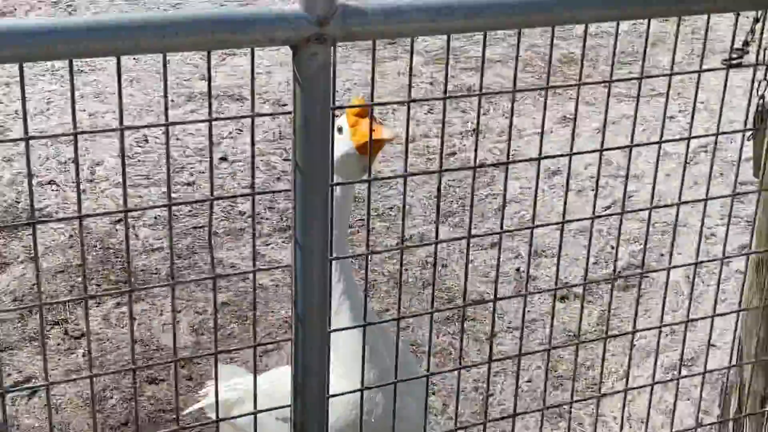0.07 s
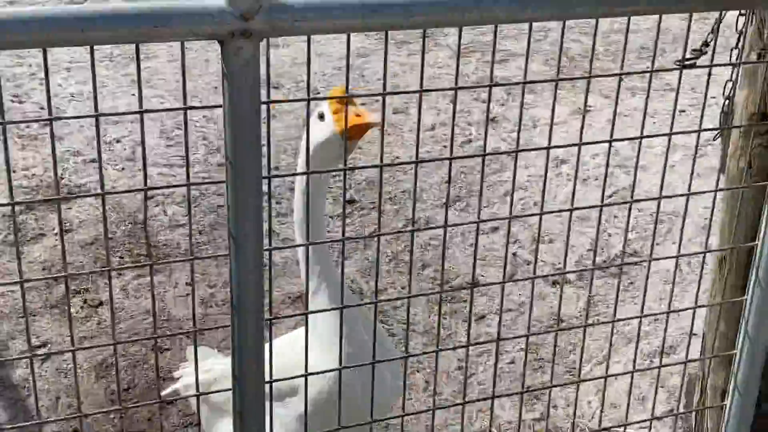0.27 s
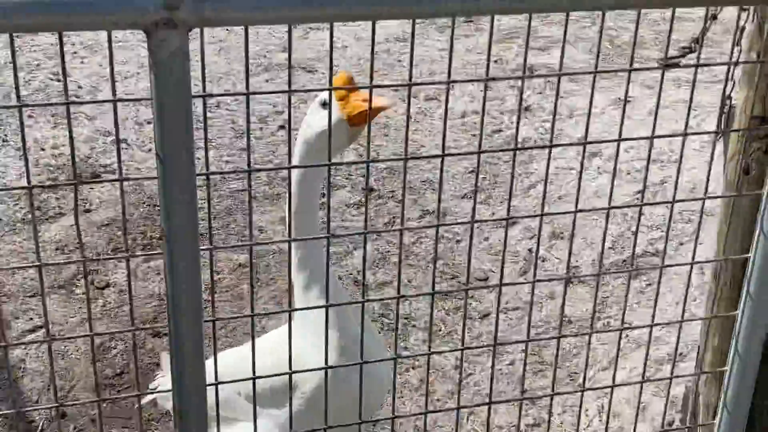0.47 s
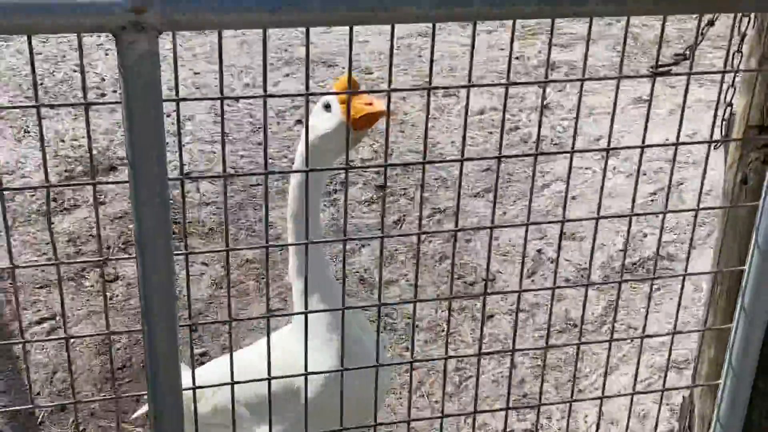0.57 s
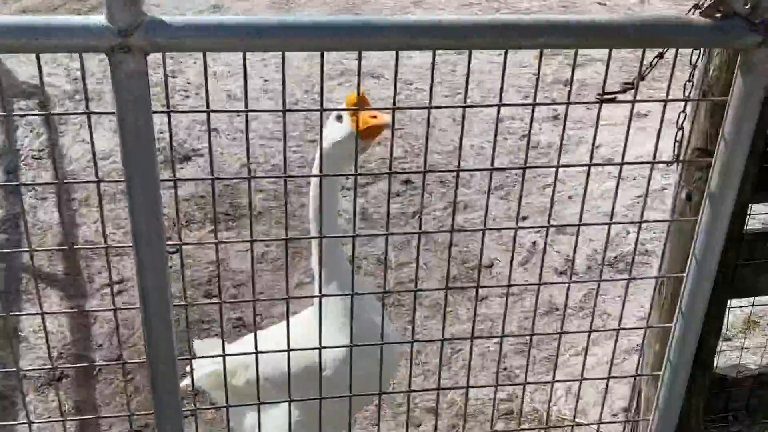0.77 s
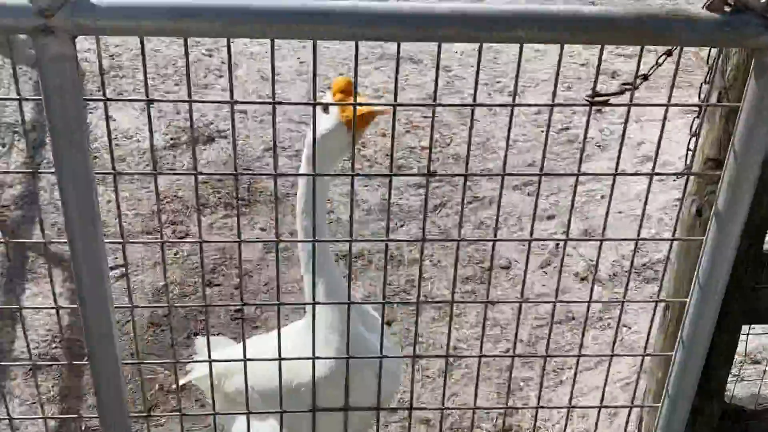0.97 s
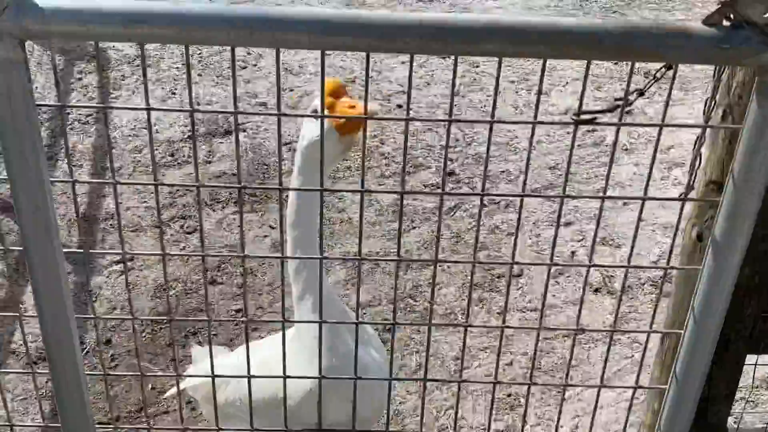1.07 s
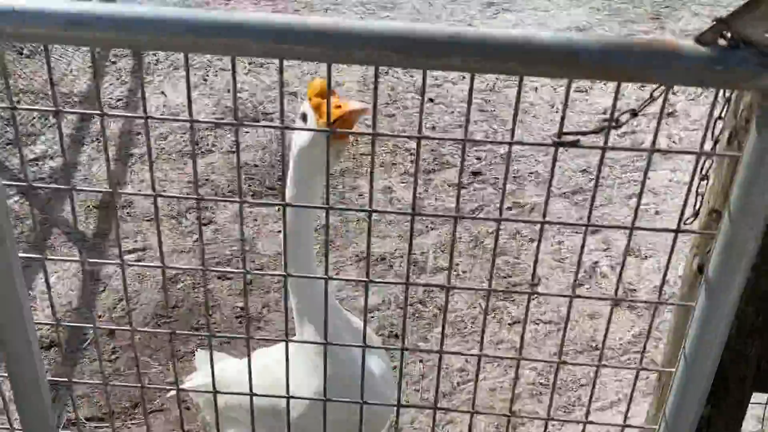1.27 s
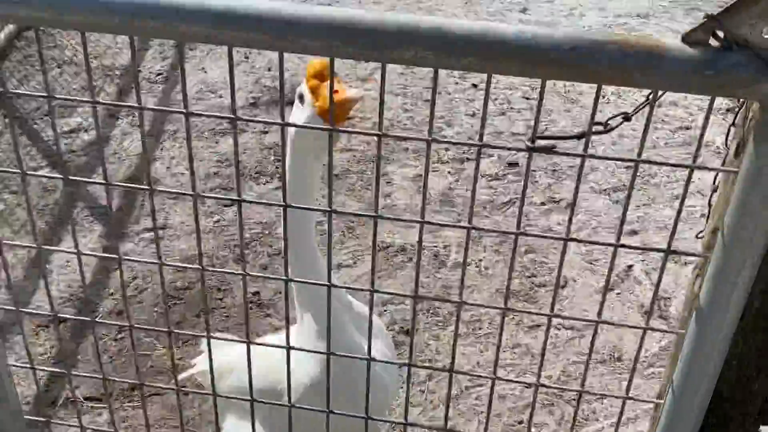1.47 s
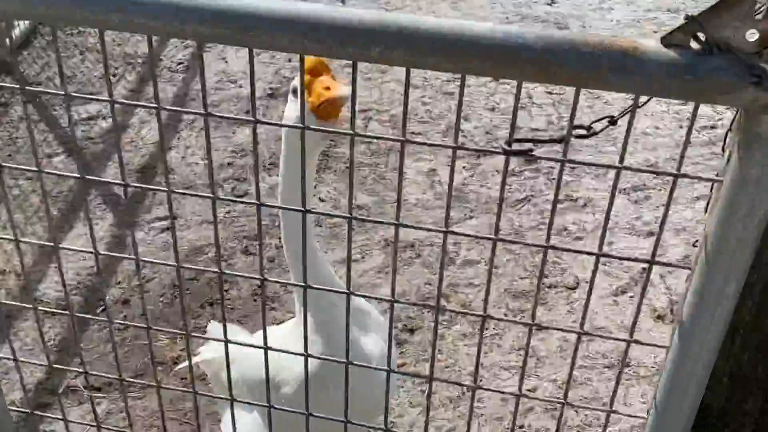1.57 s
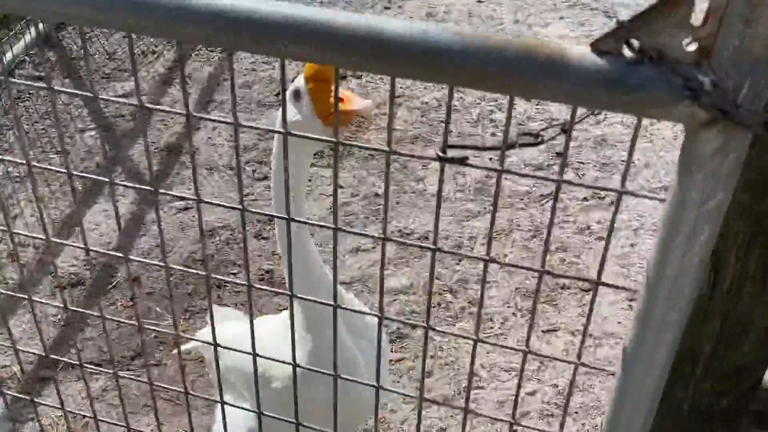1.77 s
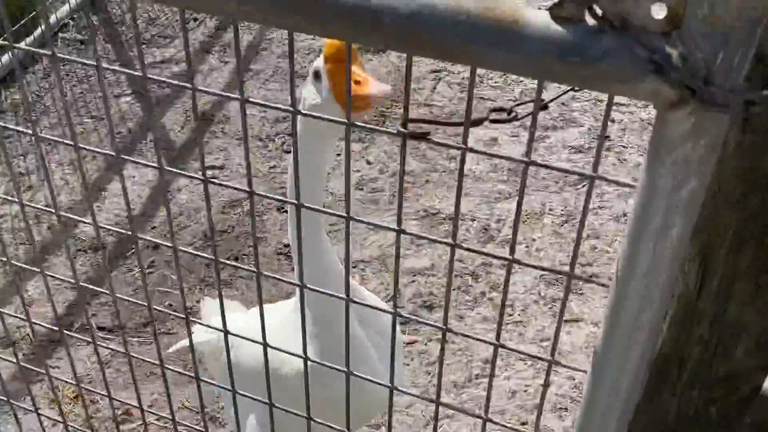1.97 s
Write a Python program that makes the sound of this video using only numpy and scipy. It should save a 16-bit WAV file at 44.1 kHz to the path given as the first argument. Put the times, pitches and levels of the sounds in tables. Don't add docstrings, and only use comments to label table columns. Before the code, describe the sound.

After small dry taps and a faint feather rustle in an open dirt pen, one abrupt goose honk bursts out slightly left, then drops into a rough growl with a last knock; faint wind and steady hiss behind.

```python
import sys
import numpy as np
from scipy import signal
from scipy.fft import rfft, irfft
from scipy.io import wavfile

SR = 44100
rng = np.random.default_rng(int(sys.argv[2]) if len(sys.argv) > 2 else 0)


def persist_wave(psi):
    counts = np.round(np.clip(psi, -1, 1) * 32767).astype(np.int16)
    wavfile.write(sys.argv[1], SR, np.atleast_2d(counts).T)


def rack_gain(trim_db):
    fader = np.asarray(trim_db, float)
    return 10 ** (fader / 20)


N = 88861
T = np.arange(N) / SR


def in_time(rows):
    s, *columns = np.transpose(rows)
    gate = np.clip(np.minimum(T - s[0], s[-1] - T) / 0.0024, 0, 1)
    return [np.interp(T, s, c) for c in columns] + [gate]


def at_hz(points, hz):
    table_hz, values = np.transpose(points)
    return np.interp(np.log(hz), np.log(table_hz), values)


def rms_one(x):
    return x / np.sqrt(np.mean(x ** 2) + 1e-20)


def drift(rate):
    r = np.exp(-2 * np.pi * rate / SR)
    walk = signal.lfilter([1], [1, -2 * r, r * r], rng.standard_normal(N + SR))
    return rms_one(walk[SR:])


def filtered(x, order, hz, kind):
    return signal.sosfilt(signal.butter(order, hz, kind, fs=SR, output="sos"), x)


def turn(hz, wander=0.0023):
    return 2 * np.pi * np.cumsum(hz * (1 + wander * drift(61))) / SR


def stack(levels_db, phase, start, other=0, hz=None, other_hz=0):
    # time in seconds, centre in Hz, lift in dB.
    beak = [(1.31, 3010, -29), (1.328, 3100, 20), (1.343, 2800, 2), (1.357, 2500, 12), (1.37, 2710, 15),
            (1.39, 2950, 1.5)]
    beak_width_hz = 230
    out = 0
    for k, db in enumerate(levels_db, start):
        shimmer_db = (1.2 + 0.1 * k) * drift(93)
        line = np.sqrt(2) * rack_gain(db + shimmer_db) * np.sin(k * phase + other + rng.uniform(0, 5.24))
        if hz is not None:
            centre_hz, lift_db, _ = in_time(beak)
            off_centre = (k * hz + other_hz - centre_hz) / beak_width_hz
            line = line * rack_gain(lift_db / (1 + off_centre ** 2))
        out = out + line
    return out


def banded_noise(spectrum, patchy_db, rate):
    # pitch in Hz, likeness (1 is the same).
    likeness = [(40, .92), (125, .75), (300, .6), (1700, .6), (15000, .6)]
    out, together, edges = 0, drift(rate), 20 * 2 ** np.arange(0, 9.8, .5)
    white = rng.standard_normal((2, 2, N))
    for k, (low, high) in enumerate(zip(edges, edges[1:])):
        hz = np.sqrt(low * high)
        if not spectrum[0][0] * .8 < hz < spectrum[-1][0] * 1.2:
            continue
        mid, side = filtered(white[k % 2], 2, [low, high], "band")
        alike = np.clip(at_hz(likeness, hz), -1, 1)
        gain = rack_gain(at_hz(spectrum, hz) + patchy_db * (0.3 * together + drift(rate)))
        out = out + gain * (np.sqrt(1 + alike) * mid + np.sqrt(1 - alike) * side * [[1], [-1]])
    return rms_one(out)


def background():
    # pitch in Hz, level in dB per Hz.
    wind_colour = [(12, -44), (20, -22.5), (64, 0.5), (124, -8), (178, 1), (206, -26.5), (221, -20.5),
                   (300, -16), (390, -42), (660, -120)]
    hiss_colour = [(180, -55), (300, -12), (404, -8), (769, -6.5), (1810, -7.5), (4000, -10),
                   (12100, -15.5), (14500, -4), (15500, -23)]
    # time in seconds, level in dB.
    gusts = [(0.0, -22), (0.02, -47.5), (0.45, -46.5), (0.53, -50), (0.55, -50.5), (0.78, -49), (0.85, -42),
             (0.9, -50), (0.95, -42.5), (0.98, -47), (1.46, -58), (1.48, -50), (1.84, -45), (1.87, -62),
             (1.94, -40), (2.01, -42)]
    # time in seconds, gain in dB.
    duck = [(0, -0.5), (1.17, -2), (1.22, 2.5), (1.45, -20), (1.52, -6), (1.62, -3), (2.02, -6.5)]
    wind_db, hiss_db, gust_follows = -42.5, -44.5, 0.6
    wide_below_hz = 2100
    duck_db, _ = in_time(duck)
    gust_db = in_time(gusts)[0] - duck_db
    wind_level = rack_gain(wind_db + gust_follows * (gust_db - gust_db.mean()))
    wind = wind_level * banded_noise(wind_colour, patchy_db=4.0, rate=9.5)
    both = wind + rack_gain(hiss_db) * banded_noise(hiss_colour, patchy_db=1.57, rate=78)
    hz = np.fft.rfftfreq(N, 1 / SR)
    mid = both.mean(axis=0)
    side = irfft(rfft(both[0] - both[1]) / (2 + 2 * (hz / wide_below_hz) ** 20), N)
    return rack_gain(duck_db) * (mid + side * [[1], [-1]])


def taps():
    # start in seconds, peak in dB, ring in Hz, crack in dB, ring length in cycles.
    touches = [(.088, -31.5, 595, -20, 5.3), (.103, -31.5, 590, -18, 8.9), (0.169, -34, 675, -20, 19),
               (.195, -31.5, 1210, -9, 18), (.215, -37.5, 710, -22, 22), (0.402, -23.5, 785, 1, 10.4),
               (.4055, -20.5, 560, -18, 5.2), (.411, -28.5, 305, -20, 2.2), (.777, -42, 630, 8, 15),
               (.803, -29, 758, -25, 29), (0.886, -33.5, 1280, -12, 38), (1.4809, -16.5, 539, -14, 13.5),
               (1.54, -25, 787, -30, 14)]
    crack_t60_s, crack_cut_hz = .02, 1800
    thud_ratio, thud_db = 0.726, -7
    snap_s, snap_db, snap_t60_s = 1.482, -36.5, 0.0047
    out = np.zeros(N + SR)
    t = np.arange(SR // 20) / SR
    crack_filter = signal.butter(4, crack_cut_hz, fs=SR)
    for s, db, hz, crack_db, cycles in touches:
        ring = rack_gain(-60 * t * hz / cycles) * np.minimum(t / 0.001, 1) * np.sin(2 * np.pi * hz * t)
        thud_hz = thud_ratio * hz
        softer_db = 2 * min(db + 25.5, 0)
        thud = rack_gain(thud_db + softer_db - 60 * t * thud_hz / cycles) * np.sin(2 * np.pi * thud_hz * t)
        grit = signal.lfilter(*crack_filter, 2 * rng.standard_normal(len(t)))
        crack = rack_gain(crack_db - 60 * t / crack_t60_s) * grit
        i = int(s * SR)
        out[i:i + len(t)] += rack_gain(db) * (ring + thud + crack)
    snap_filter = signal.butter(1, [4000, 11000], "band", fs=SR)
    snap = signal.lfilter(*snap_filter, 2 * rng.standard_normal(len(t)))
    i = int(snap_s * SR)
    out[i:i + len(t)] += rack_gain(snap_db - 60 * t / snap_t60_s) * snap
    return filtered(out[:N], 2, 220, "high")


def rustle():
    # time in seconds, level in dB.
    brush = [(.15, -69), (.175, -49), (.23, -48.5), (.27, -57.5)]
    db, gate = in_time(brush)
    grains = rng.standard_normal(N) * rack_gain(5.9 * drift(70))
    return gate * rack_gain(db) * rms_one(filtered(grains, 2, [600, 2000], "band"))


def air():
    # time in seconds, level in dB.
    breath = [(1.14, -54), (1.195, -41), (1.21, -40), (1.25, -31.5), (1.3, -33.5), (1.355, -25.5),
              (1.4, -51), (1.43, -39.5), (1.47, -51.5), (1.55, -65)]
    # pitch in Hz, level in dB per Hz.
    throat = [(600, -39), (900, 16), (1600, -5), (2500, 9), (4500, -1.5), (7000, -12), (10000, -6.5),
              (15500, -35)]
    db, gate = in_time(breath)
    rush = banded_noise(throat, patchy_db=2.0, rate=70)[0]
    return gate * rack_gain(db) * filtered(rush, 4, 650, "high")


def brilliance():
    # time in seconds, level in dB, lift of the top part in dB.
    beak_hiss = [(1.19, -69, 0), (1.21, -58, 9), (1.24, -57, 5), (1.28, -49, 6), (1.31, -50, -8),
                 (1.35, -39, -12), (1.385, -53, -9), (1.41, -78, -4)]
    db, top_db, gate = in_time(beak_hiss)
    flicker = rack_gain(1.5 * drift(80))
    white = rng.standard_normal(N)
    low = rms_one(filtered(white, 3, [8700, 12000], "band"))
    top = rms_one(filtered(white, 3, [12000, 16000], "band"))
    return gate * rack_gain(db) * flicker * (low + rack_gain(top_db) * top)


def lead():
    # time in seconds, pitch in Hz, level in dB, overtone lift in dB.
    rise = [
        (1.14, 699.6, -53, 6),
        (1.15, 688, -32.5, 18),
        (1.165, 747.4, -25, 16.5),
        (1.18, 765, -13.5, 2),
        (1.198, 799, -8.5, -12.5),
        (1.206, 765, -18.5, -12),
        (1.212, 850, -72, -14),
    ]
    overtones_db = [-21, -22.5, -26.5, -31, -28.5, -40, -41]
    hz, db, lift_db, gate = in_time(rise)
    phase = turn(hz)
    overtones = rack_gain(lift_db) * stack(overtones_db, phase, start=2)
    return gate * rack_gain(db) * (np.sqrt(2) * np.sin(phase) + overtones)


def honk():
    # time in seconds, pitch in Hz, level, second multiple, third multiple, overtone lift in dB.
    main_note = [(1.199, 1090, -14.5, -29, -50, -20), (1.207, 1128, -12.5, -16.5, -59, -28),
                 (1.225, 1147, -11, -17.5, -40, -4), (1.245, 1164, -15, -13.5, -25.5, -5.5),
                 (1.27, 1179, -16.5, -32.5, -23.5, 6), (1.282, 1177, -18.5, -23.5, -27.5, 10),
                 (1.325, 1192, -21, -37, -36, -8), (1.357, 1194, -19.5, -14.5, -46, 7),
                 (1.382, 1190, -44.5, -44, -50, -4)]
    # time in seconds, level in dB.
    fourth = [(1.199, -50), (1.212, -28), (1.225, -18.5), (1.245, -31), (1.262, -26.5), (1.29, -29.5),
              (1.32, -27), (1.34, -38), (1.382, -66)]
    overtones_db = [-21.5, -24.5, -21, -43.5, -42, -43, -44, -43]
    # time in seconds, pitch in Hz, level in dB.
    flutter = [(1.2, 204, -51), (1.21, 212, -21), (1.228, 203, -32), (1.24, 195, -57)]
    low = [(1.2, 792, -20), (1.215, 740, -30.5), (1.24, 743, -31.5), (1.265, 789, -21), (1.28, 778, -34),
           (1.31, 786, -38.5), (1.345, 800, -44), (1.37, 754, -34)]
    high = [(1.312, 1448, -36), (1.325, 1439, -32.5), (1.345, 1437, -33.5), (1.375, 1462, -31),
            (1.39, 1446, -27), (1.41, 1382, -102)]
    flutter_up_db = [-6, -6, -14, -16, -18]
    flutter_down_db = [0, -5, -12, -18]
    low_up_db = [1, -40, -11, -18]
    low_down_db = [-32, -48, -2, -12.5, -12, -11, -17.5]
    high_up_db = [-2, -3.5, -2, -7, -18, -10]
    high_down_db = [-27.5, -1.5, -4.5, -23]
    high_own_db = [-2.5, -7, -15, -8.5, -27]

    hz, db, second_db, third_db, lift_db, gate = in_time(main_note)
    phase = turn(hz)
    out = rack_gain(db + lift_db) * stack(overtones_db, phase, start=5)
    for k, level_db in enumerate((db, second_db, third_db, in_time(fourth)[0]), 1):
        out = out + np.sqrt(2) * rack_gain(level_db) * np.sin(k * phase)

    beats_fade = rack_gain(.5 * np.minimum(db + 31.0, 0))
    partners = ((flutter, flutter_up_db, flutter_down_db, .08),
                (low, low_up_db, low_down_db, .008),
                (high, high_up_db, high_down_db, .003))
    for rows, up_db, down_db, wander in partners:
        other_hz, other_db, other_gate = in_time(rows)
        other = turn(other_hz, wander)
        shaped = hz if rows is high else None
        beats = stack(up_db, phase, 1, other, shaped, other_hz)
        beats = beats + stack(down_db, phase, 1, -other, shaped, -other_hz)
        voice = beats * beats_fade
        if rows is low:
            voice = voice + np.sqrt(2) * np.sin(other)
        out = out + other_gate * rack_gain(other_db) * voice
    return gate * out + other_gate * rack_gain(other_db) * stack(high_own_db, other, 1, hz=other_hz)


def croak():
    # time in seconds, pitch in Hz, level in dB, overtone lift in dB.
    fall = [(1.382, 608, -39, -10), (1.4, 552, -40, -1.5), (1.413, 482.5, -32.5, 1), (1.422, 452, -41, 17),
            (1.432, 442.5, -40, 17.5), (1.445, 433.7, -48, 18.5), (1.458, 445, -63.5, 35.5)]
    upper_db = [-9, -21, -16, -15, -30]
    rasp_db = 3
    hz, db, lift_db, gate = in_time(fall)
    phase = turn(hz, wander=0.012)
    roughness = rack_gain(rasp_db * drift(360) + .5 * np.minimum(db + 56, 0))
    upper = roughness * stack(upper_db, phase, start=3)
    overtones = rack_gain(lift_db) * (stack([0], phase, start=2) + upper)
    return gate * rack_gain(db) * (np.sqrt(2) * np.sin(phase) + overtones)


def growl():
    # time in seconds, pitch in Hz, level in dB, partner in dB, overtones in dB.
    release = [(1.448, 860, -44, -58, -68), (1.462, 836, -28.5, -36, -51), (1.472, 816, -43, -25.5, -43),
               (1.48, 784, -26.5, -65, -37), (1.495, 834, -33.5, -36, -42), (1.505, 796, -37, -40, -46),
               (1.525, 772, -39, -35.5, -70), (1.538, 754, -33, -73, -80)]
    # time in seconds, pitch in Hz.
    sinking = [(1.44, 1090), (1.46, 1040), (1.49, 1025), (1.54, 990)]
    rasp_db = 1.5
    hz, db, partner_db, over_db, gate = in_time(release)
    phase = turn(hz, wander=.008)
    partner = stack([0], turn(in_time(sinking)[0], wander=.008), 1)
    voice = rack_gain(db) * stack([0], phase, 1) + rack_gain(partner_db) * partner
    voice = voice + rack_gain(over_db) * stack([0, -1.5], phase, 2)
    return gate * rack_gain(rasp_db * drift(250)) * voice


def placed(near):
    # pitch in Hz, left over right in dB.
    left_over_right = [(200, 1), (700, 1.5), (1300, 3), (2400, 2.6), (4400, 2), (7500, 0)]
    # delay in seconds, left level in dB, right level in dB.
    echoes = [
        (.011, -12.5, -36),
        (.037, -54, -18),
    ]
    echo_cut_hz = 6500
    hz = np.fft.rfftfreq(N, 1 / SR)
    tilt = at_hz(left_over_right, hz + 1) / 2
    dull = 1 / (1 + (hz / echo_cut_hz) ** 20)
    paths = []
    for column, share in ((1, 0.75), (2, -2.68)):
        bounced = sum(rack_gain(e[column]) * np.exp(-2j * np.pi * hz * e[0]) for e in echoes)
        paths.append(rack_gain(tilt * share) + dull * bounced)
    return irfft(rfft(near) * np.array(paths), N)


def scene():
    body = taps() + rustle()
    voice = air() + brilliance() + lead() + honk() + croak() + growl()
    return placed(body + voice) + background()


def roll_off(x):
    return signal.sosfilt(signal.butter(12, 15670, fs=SR, output="sos"), x)


def record(dry):
    # pitch in Hz, lag of the left in half turns.
    ports = [(0, 0), (7300, 0), (8400, 1), (8600, 1), (9750, 2), (10500, 2), (11700, 3), (12400, 3),
             (13600, 4), (14300, 4), (15600, 5)]
    lag = np.pi * np.interp(np.fft.rfftfreq(N, 1 / SR), *np.transpose(ports))
    mix = irfft(rfft(dry) * np.exp(-.5j * lag * [[1], [-1]]), N)
    return roll_off(mix)


dry = scene()
out = record(dry)
persist_wave(out)
```